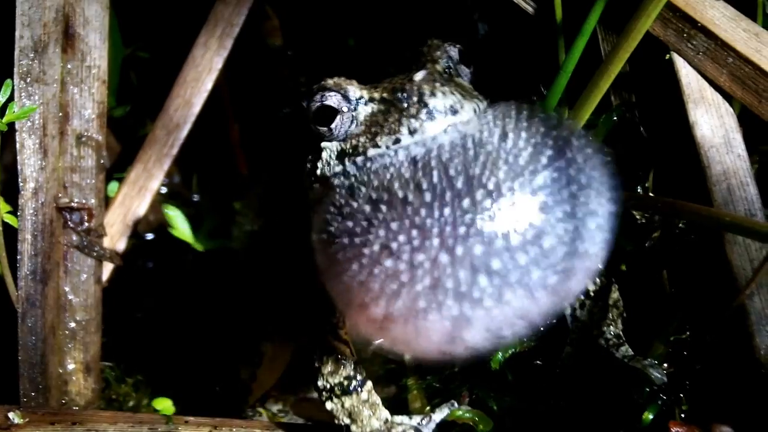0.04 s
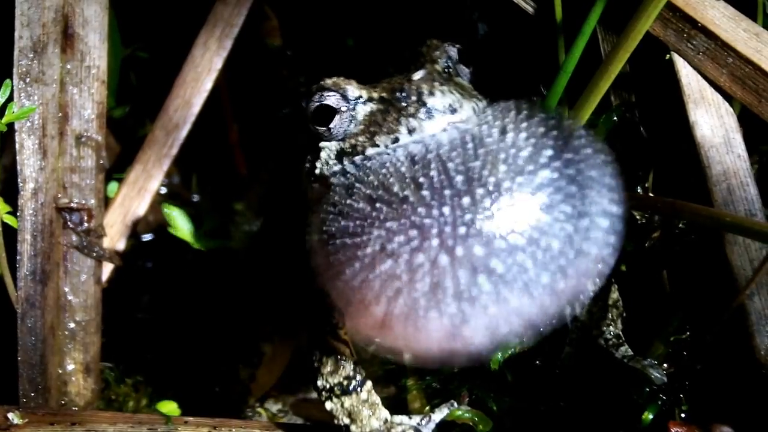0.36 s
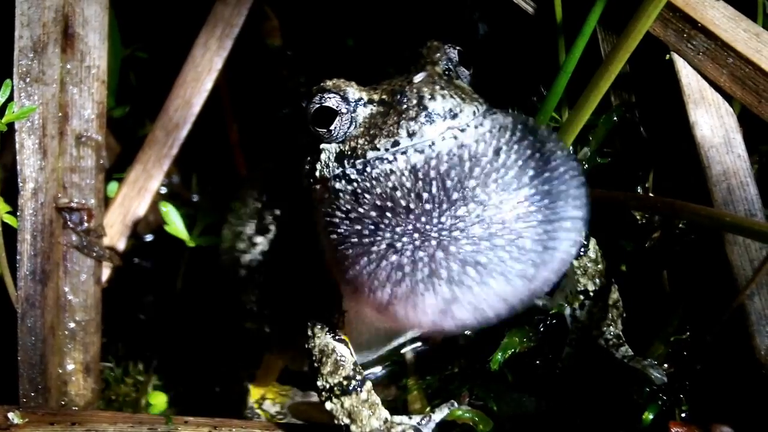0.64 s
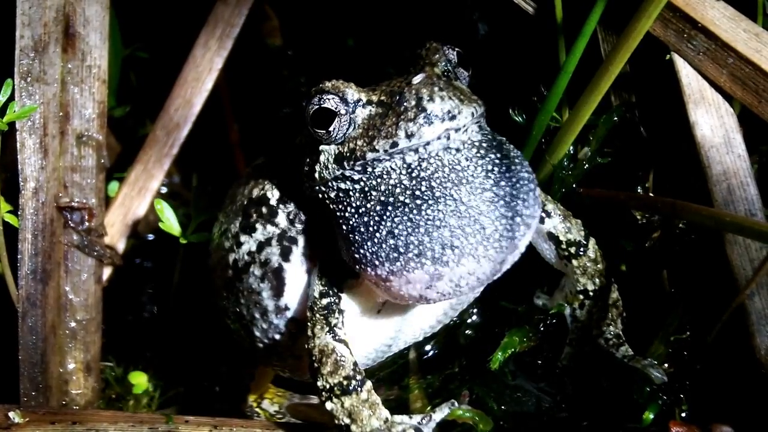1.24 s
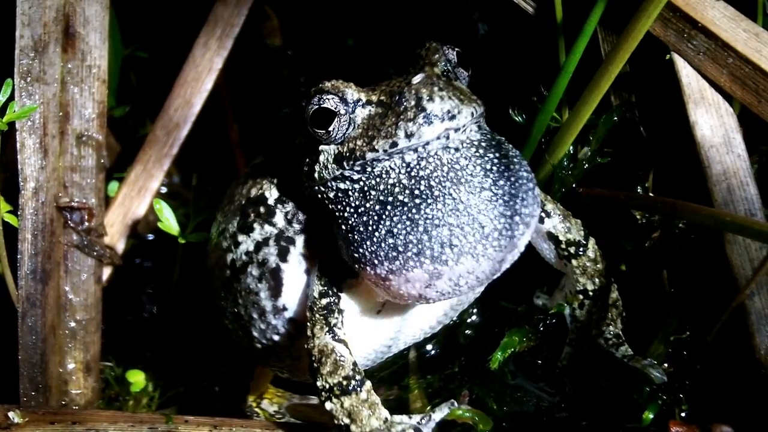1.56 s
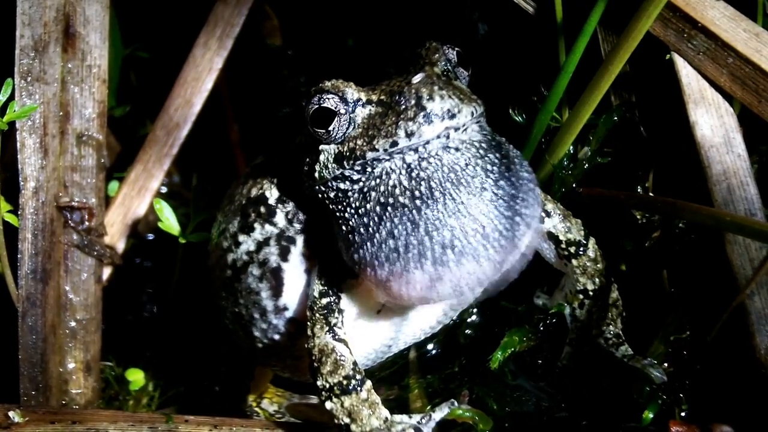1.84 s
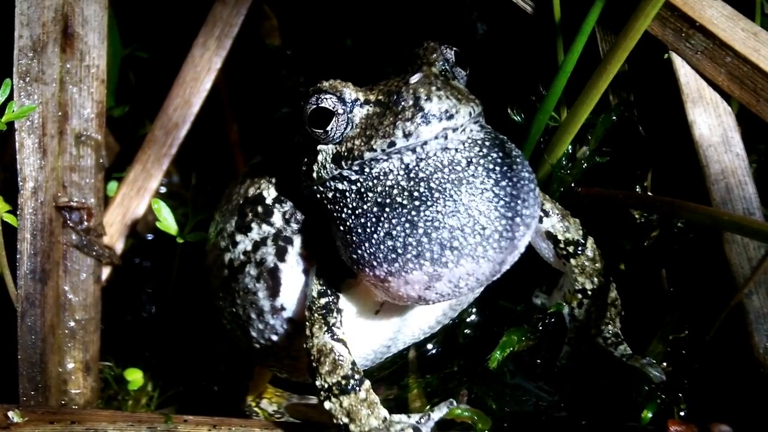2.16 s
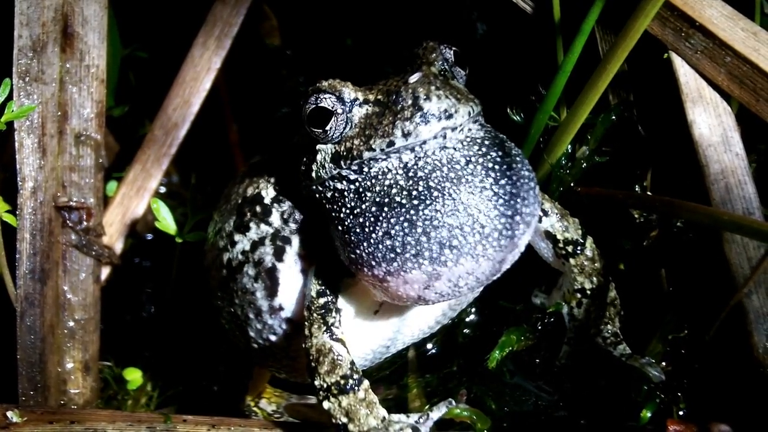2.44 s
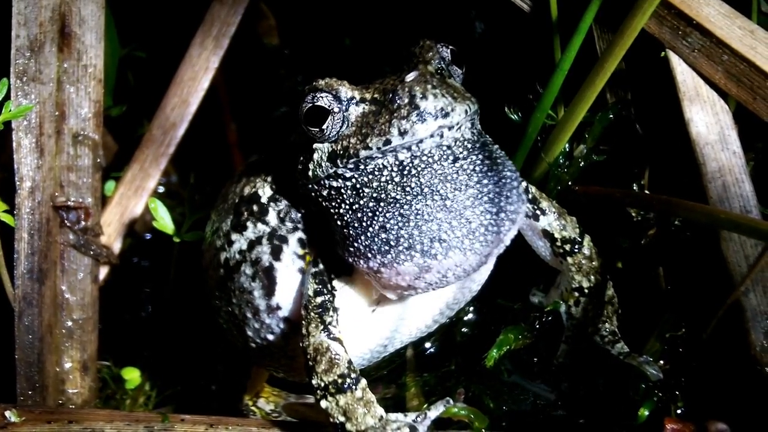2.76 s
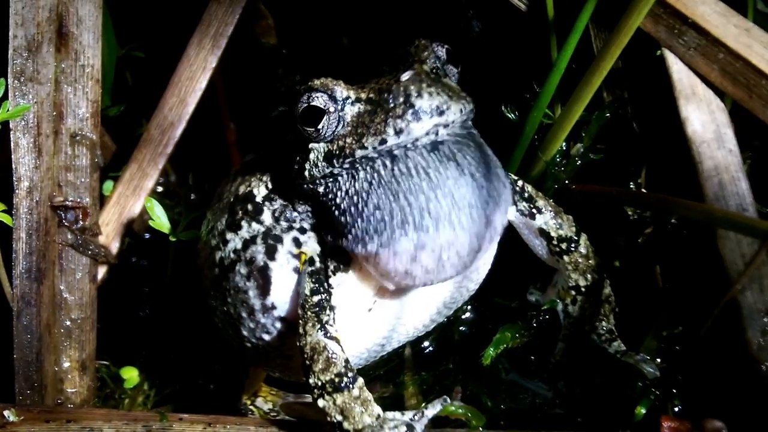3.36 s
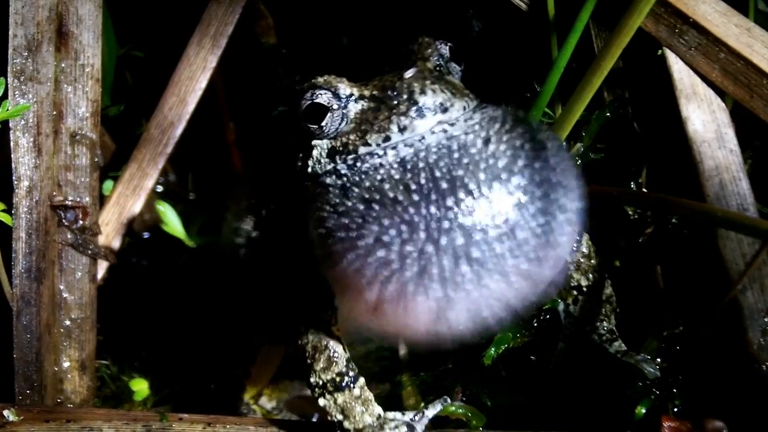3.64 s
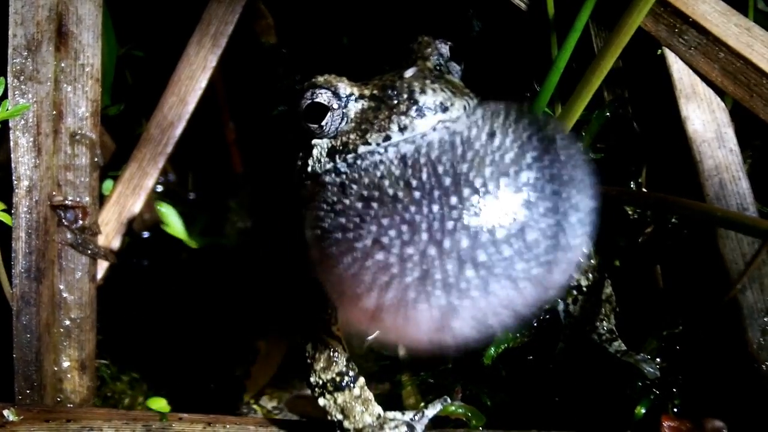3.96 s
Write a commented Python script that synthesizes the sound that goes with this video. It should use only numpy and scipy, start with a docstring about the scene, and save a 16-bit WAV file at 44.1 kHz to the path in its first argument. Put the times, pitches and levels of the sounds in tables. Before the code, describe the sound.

A loud, rapidly pulsing tree frog trill sounds up close beside a pond at night. When it stops, small frogs' rising, whistled peeps come forward with more distant trills. The near frog briefly resumes at the end.

```python
"""Tree frogs at a night pond

A tree frog trills right up close, rests, and starts again; each pulse is a rising tone that swells
and is cut off sharply. In the pause the gain control opens on three more tree frogs and a dense
chorus of small frogs whose peeps glide upward, over distant trills and the wash of the pond."""
import sys
import numpy as np
from scipy import signal
from scipy.io import wavfile
from scipy.ndimage import uniform_filter1d, minimum_filter1d

SR = 44100
rng = np.random.default_rng(int(sys.argv[2]) if len(sys.argv) > 2 else 0)


def master(y):
    """Save y as 16-bit WAV."""
    cut = np.clip(np.atleast_2d(y).T, -1, 1)
    pcm = np.round(cut * 32767)  # scale
    wavfile.write(sys.argv[1], SR, pcm.astype(np.int16))


N = 176400

# The close frog's pulses: cutoff_s, level_db, pitch_hz, length_s, relative_glide_per_s
CLOSE_PULSES = [(0.0232, 25.5, 986, 0.015, 11.8), (0.076, 23.5, 1006, 0.016, 10.6),
                (0.1257, 25, 1018, 0.014, 6.8), (0.1773, 24.5, 1017, 0.017, 8.2),
                (0.2293, 25, 1021, 0.016, 7.5), (0.2793, 24.5, 1031, 0.015, 8.7),
                (0.3296, 24.5, 1028, 0.015, 8.1), (0.3821, 25.5, 1026, 0.016, 8.1),
                (0.4323, 24.5, 1022, 0.016, 9.2), (0.4842, 25.5, 1032, 0.017, 6.8),
                (0.537, 27, 1029, 0.017, 7.5), (0.5903, 28, 1027, 0.017, 7.9),
                (0.642, 27, 1021, 0.015, 8.7), (0.6963, 28, 1028, 0.0166, 6.5),
                (0.7495, 28.5, 1027, 0.0166, 7.8), (0.8023, 29, 1029, 0.017, 6.7),
                (0.8566, 30.5, 1029, 0.017, 6.2), (0.9206, 29.5, 1016, 0.016, 6.7),
                (3.8263, -2, 899, 0.014, 32), (3.8796, 14.5, 930, 0.013, 16.5),
                (3.9297, 16.5, 931, 0.0153, 13.4), (3.9798, 18, 965, 0.015, 12)]
# How full its vocal sac is: time_s, fullness_share
SAC_FULLNESS = [(0, 0.89), (.9, 0.89), (3.83, 0.096), (3.93, 0.45), (3.98, 0.59)]
# Harmonics of a pulse, fundamental first: level_db, swell_factor, decay_db_per_s
PULSE_HARMONICS = [(-12, 0.48, 2702.5), (1, 0.91, 5202.5), (-18, 0.78, 11015.5), (-33, 1.0, 11991.5),
                   (-42.5, 1, 12000), (-45.5, 0.6, 12000), (-61.5, 1, 12007)]
# Tone colour of a tree frog's body: frequency_hz, gain_db
BODY_EQ = [(100, -50), (560, -33), (700, -28.5), (820, -4.5), (1000, -2.5), (1200, 5), (1450, -4),
           (1700, -3), (2050, 2), (2700, 0), (4200, 9.5), (6400, 1), (7300, 1), (7800, -26.5), (9500, -14),
           (11300, -1), (12500, -24), (16000, -42)]
# The neighbouring frog's pulses: cutoff_s, level_db, pitch_hz
NEIGHBOUR_PULSES = [(1.481, -22, 989), (1.536, -7.5, 914), (1.579, -2, 954), (1.624, 0, 960),
                    (1.671, -0.5, 965), (1.716, -1.5, 980), (1.763, -1.5, 975), (1.809, -1, 976),
                    (1.856, -1, 970), (1.904, -2, 972), (1.952, -2.5, 971), (2.001, -4, 971),
                    (2.05, -1, 977), (2.098, -1.5, 974), (2.145, -1.5, 993), (2.196, -1.5, 969),
                    (2.244, -12, 978), (2.289, -10, 979), (2.338, -10, 981), (2.39, -8.5, 981),
                    (2.44, -10.5, 972), (2.492, -8, 985), (2.544, -9.5, 970), (2.599, -9.5, 973),
                    (2.652, -8.5, 991), (2.711, -10.5, 976), (3.754, -6, 923), (3.798, -3.5, 922),
                    (3.845, -8, 980)]
# Pulses of a frog further off: cutoff_s, level_db, pitch_hz
FURTHER_PULSES = [(0.991, -43.5, 968), (1.036, -30, 999), (1.089, -19.5, 978), (1.137, -19.5, 996),
                  (1.19, -20.5, 959), (1.242, -16.5, 985), (2.842, -18.5, 948), (2.894, -14.5, 1005),
                  (2.938, -20, 941), (2.984, -16, 975), (3.037, -14, 995), (3.075, -19, 941),
                  (3.125, -18, 962), (3.173, -25, 956), (3.217, -27, 989), (3.291, -25.5, 965),
                  (3.342, -19, 998), (3.405, -24.5, 1011), (3.466, -21.5, 1005), (3.526, -34, 1011),
                  (3.591, -22.5, 1006), (3.648, -22, 1025)]
# Peeps that stand out of the chorus: start_s, length_s, first_hz, last_hz, level_db
NEAR_PEEPS = [(1.031, 0.1, 3580, 3760, -25), (1.034, 0.07, 3130, 3500, -14),
              (1.148, 0.27, 2690, 3100, -29.5), (1.167, .1, 3560, 3730, -36), (1.2, 0.19, 3250, 3500, -21),
              (1.249, 0.078, 3660, 3944, -20), (1.368, 0.091, 3102, 3370, -13.5),
              (1.445, 0.079, 3330, 3680, -24), (1.49, 0.071, 3102, 3350, -11.5),
              (1.55, 0.064, 3424, 3496, -21), (1.558, 0.084, 3203, 3425, -12.5),
              (1.727, 0.067, 3540, 3800, -28.5), (1.739, 0.058, 3256, 3440, -10),
              (1.955, 0.058, 2950, 3190, -4), (1.959, 0.11, 3650, 3940, -31.5),
              (2.076, .11, 2690, 2900, -38), (2.274, 0.079, 3120, 3270, -12.5),
              (2.383, 0.082, 3200, 3310, -14.5), (2.515, 0.067, 3150, 3377, -16),
              (2.522, 0.078, 3526, 3750, -25.5), (2.625, .08, 3250, 3550, -20),
              (2.656, 0.08, 3630, 3954, -25.5), (2.852, 0.065, 3000, 3090, -24.5),
              (2.856, 0.077, 2570, 2780, -36.5), (2.9, 0.098, 3067, 3296, -16.5),
              (3.035, 0.076, 3166, 3373, -18), (3.041, 0.19, 2640, 3134, -33),
              (3.14, 0.14, 3250, 3750, -20.5), (3.148, 0.052, 3100, 3200, -19),
              (3.33, 0.052, 3070, 3220, -25.5), (3.343, 0.082, 3736, 3910, -24.5),
              (3.53, 0.12, 3083, 3276, -17), (3.658, 0.15, 3130, 3464, -15),
              (3.748, 0.091, 3090, 3220, -18), (3.793, 0.059, 3520, 3690, -28),
              (2.701, 0.062, 3208, 3460, -2), (3.474, 0.061, 3256, 3470, -2)]
# Spectrum of the pond's far wash: frequency_hz, level_db
WASH_SPECTRUM = [(20, -29), (80, -14), (170, -19.5), (330, -23.5), (680, -24.5), (980, -5.5), (1400, -24.5),
                 (1980, -5), (2600, -29.5), (2950, -14), (3330, 1), (3750, -10.5), (4200, -33.5),
                 (4950, -27), (5700, -37), (6900, -42), (7900, -63.5), (9300, -44.5), (12000, -45),
                 (15500, -55)]
# Echo of reeds and banks: frequency_hz, t60_s
POND_DECAY = [(300, 0.6), (1000, 0.088), (2000, .3), (3300, .4), (8000, 0.085)]


def trill_pulse(length, hz, glide, slack=0):
    """Tone and airflow of a pulse: raspy start, clean rising crest, cut-off at 2 * length, short ring."""
    crest_s, swell_db, closing_db = .00608, -16.5, -8.5
    flat_start, end_flick, flick_s = .05, .087, .00047
    sac_rise_db_per_s, slack_db, hiss_db = 194.5, 12.5, -44
    t = np.arange(-2 * length, .02, 1 / SR)  # zero is the cut-off
    before, after = np.minimum(t, 0), np.maximum(t, 0)
    envelope_db = swell_db * (np.maximum(-t - crest_s, 0) / max(length - crest_s, .002)) ** 1.49
    envelope_db += closing_db * np.clip(1 + before / crest_s, 0, 1) ** 3
    pitch = hz * np.exp(glide * (before + crest_s)) * (1 + end_flick * np.exp(before / flick_s))
    pitch *= 1 - flat_start * np.tanh((before / length) ** 2)
    rasp = .48 * (np.clip(-t / length, 0, 1.4) ** 4 + .46 * slack)
    phase = 2 * np.pi * np.cumsum(pitch) / SR + rasp / 2 * wander(t, 600) + rng.uniform(0, 2 * np.pi)
    # A slack sac favours the fundamental.
    sac_db = sac_rise_db_per_s * (before + crest_s) + slack_db * slack
    tone = sum(amp(db + swell * envelope_db - decay * after + (k == 1) * sac_db) * np.cos(k * phase)
               for k, (db, swell, decay) in enumerate(PULSE_HARMONICS, 1))
    hiss = amp(hiss_db + .5 * envelope_db - 1000 * after) * rng.standard_normal(len(t))
    tone *= 1 + rasp * wander(t, 900)
    airflow = amp(.6 * envelope_db - 13000 * after)
    fade_in = np.minimum((t - t[0]) / .004, 1)
    return fade_in * (tone + hiss), fade_in * airflow


def frog_body(x, size=4096):
    """The body's resonances colour the voice, as a minimum-phase filter."""
    log_gain = np.log(amp(curve_at(BODY_EQ, abs(np.fft.fftfreq(size, 1 / SR)))))
    ring = np.fft.ifft(np.exp(signal.hilbert(log_gain).conj())).real
    return signal.fftconvolve(x, ring[:size // 2])[:N]


def close_frog(puff_db=-21, puff_low_hz=24, puff_high_hz=300, wet_db=-44):
    """The lead trill, almost dry; the heaving vocal sac pushes puffs of air, weaker when it is slack."""
    voice, air = np.zeros(N), np.zeros(N)
    for cutoff, db, hz, length, glide in CLOSE_PULSES:
        fullness = np.interp(cutoff, *np.transpose(SAC_FULLNESS))
        tone, airflow = trill_pulse(length, hz, glide, slack=1 - fullness)
        add(voice, cutoff - 2 * length, amp(db) * tone)
        add(air, cutoff - 2 * length, amp(db) * fullness ** 2 * airflow)
    voice = frog_body(voice)
    puff = signal.sosfilt(signal.butter(2, puff_low_hz, "high", fs=SR, output="sos"), air)
    puff = signal.sosfiltfilt(signal.butter(2, puff_high_hz, fs=SR, output="sos"), puff)
    return voice + amp(puff_db) * puff + amp(wet_db) * pond_echo(voice)


def other_frog(pulses, length_s=.02, glide_per_s=8.6, wet_db=-8.5, lowpass_hz=1870):
    """The same kind of trill from further away: duller and wetter."""
    voice = np.zeros(N)
    for cutoff, db, hz in pulses:
        add(voice, cutoff - 2 * length_s, amp(db) * trill_pulse(length_s, hz, glide_per_s)[0])
    voice = signal.sosfilt(signal.butter(3, lowpass_hz, fs=SR, output="sos"), frog_body(voice))
    return voice + amp(wet_db) * pond_echo(voice)


def joining_frog(start_s=2.8, end_s=3.46, gap_s=.0488, gain_db=-11.5, fade_db_per_s=13.5, hz=960):
    """A fourth tree frog joins late in the pause with an even, fading trill."""
    cutoffs = np.arange(start_s, end_s, gap_s)
    return other_frog([(s, gain_db - fade_db_per_s * (s - start_s), hz) for s in cutoffs])


def peep(length, first_hz, last_hz):
    """A nearly pure whistle that glides upward, with faint partials a fifth and an octave above."""
    rise_s, fall_s, waver_hz, waver_db, fifth_db, octave_db = .0062, .0077, 13, 1.6, -44, -59.5
    t = np.arange(0, length, 1 / SR)
    pitch = first_hz + (last_hz - first_hz) * t / length + waver_hz * wander(t, 120)
    phase = 2 * np.pi * np.cumsum(pitch) / SR
    ramps = np.clip(np.minimum(t / rise_s, (length - t) / fall_s), 0, 1)
    envelope = np.sin(np.pi / 2 * ramps) ** 2 * amp(waver_db * wander(t, 70))
    partials = amp(fifth_db) * np.sin(1.5 * phase) + amp(octave_db) * np.sin(2 * phase)
    return envelope * (np.sin(phase) + partials)


def near_peepers(wet_db=-24):
    """The nearest small frogs, whistling clear of the chorus."""
    voice = np.zeros(N)
    for start, length, first_hz, last_hz, db in NEAR_PEEPS:
        add(voice, start, amp(db) * peep(length, first_hz, last_hz))
    return voice + amp(wet_db) * pond_echo(voice)


def peeper_chorus(peeps_per_s=130, centre_hz=3200, spread_hz=135, rise_hz=230.8):
    """Overlapping peeps from all round the pond, softer towards the edges of their pitch range."""
    voice = np.zeros(N)
    for start in np.arange(-.1, N / SR, 1 / peeps_per_s):
        late, stretch, tune, loud = np.clip(rng.standard_normal(4), -2, 2)
        hz = centre_hz + spread_hz * tune
        call = peep(.1 * np.exp(.13 * stretch), hz, hz + rise_hz)
        add(voice, start + .018 * late, amp(5.1 * loud - .5 * tune ** 2) * call)
    return unit(voice + .25 * pond_echo(voice))


def distant_trills(frogs=4, pulses_per_s=55, centre_hz=980):
    """Tree frogs across the pond, each at its own pace and pitch."""
    voice = np.zeros(N)
    for pace, tune, offset in rng.uniform(-1, 1, (frogs, 3)):
        tone = trill_pulse(length=.02, hz=centre_hz * (1 + .071 * tune), glide=10.5)[0]
        beats = np.arange(offset - 1, N / SR * pulses_per_s * 1.2)
        for start in beats / (pulses_per_s * (1 + .038 * pace)):
            add(voice, start, tone)
    return unit(frog_body(voice + pond_echo(voice)))


def pond_wash(flicker_db=3.5):
    """Far voices blurred into flickering noise, with low night rumble and faint hiss."""
    frames, hz = N // 256 + 5, np.fft.rfftfreq(1024, 1 / SR)
    real, imag, patches = rng.standard_normal((3, frames, 513))
    patches = unit(uniform_filter1d(uniform_filter1d(patches, size=10, axis=0), size=10, axis=1))
    level_db = curve_at(WASH_SPECTRUM, hz) + flicker_db * patches * np.clip(hz / 1000, .4, 1)
    spectrum = (real + 1j * imag) * amp(level_db)
    return unit(signal.istft(spectrum.T, nperseg=1024, noverlap=768)[1][:N])


def pond_echo(x, predelay_s=.0017):
    """Sparse echoes off reeds and banks, each band dying at its own speed."""
    size = SR // 2
    taps = rng.standard_normal(size) * (rng.random(size) < .1) * (np.arange(size) > predelay_s * SR)
    hz, t, bands = signal.stft(taps, SR, nperseg=256)
    decay = amp(-60 * t / curve_at(POND_DECAY, hz)[:, None])
    tail = signal.istft(bands * decay, SR, nperseg=256)[1]
    return signal.fftconvolve(x, tail / np.linalg.norm(tail))[:N]


def gain_control(x, threshold_db=-22, ratio=7.13, sense_s=.025, attack_s=.018, release_db_per_s=124):
    """Heavy compression ducks the pond under every loud call and opens up in the gaps."""
    level_db = 10 * np.log10(lag(x ** 2, sense_s) + 1e-12)
    reduction_db = np.maximum(level_db - threshold_db, 0) * (1 - 1 / ratio)
    release_db = np.arange(N) / SR * release_db_per_s
    held_db = np.maximum.accumulate(reduction_db + release_db) - release_db
    return x * amp(-lag(held_db, attack_s))


def limiter(x, ceiling=.71, grit_knee=.26, grit_db=-25, grit_hz=3000):
    """Catches peaks that outrun the gain control; strong treble overloads with a gritty crackle."""
    treble = signal.sosfilt(signal.butter(6, 2800, "high", fs=SR, output="sos"), x)
    overload = np.clip(peak_envelope(treble) - grit_knee, 0, .5)
    crackle = rng.standard_normal(N) * amp(2 * rng.standard_normal(N))
    grit = signal.lfilter(*signal.butter(1, grit_hz, fs=SR), crackle)
    return x / np.maximum(peak_envelope(x) / ceiling, 1) + amp(grit_db) * overload * grit


def peak_envelope(x):
    """Rides the peaks over about 2 ms."""
    return uniform_filter1d(-minimum_filter1d(-abs(x), size=90), size=60)


def amp(db):
    """Decibels to gain."""
    return 10 ** (np.asarray(db) / 20)


def unit(x):
    """Scales to rms 1."""
    return x / np.sqrt(np.mean(x ** 2) + 1e-20)


def curve_at(points, hz):
    """Reads a table on a log-frequency axis."""
    f, value = np.transpose(points)
    return np.interp(np.log(hz + 1), np.log(f + 1), value)


def add(mix, start_s, sound):
    """Mixes a sound in at its cue."""
    at = round(start_s * SR)
    sound = sound[max(-at, 0):]
    part = mix[max(at, 0):][:len(sound)]
    part += sound[:len(part)]


def lag(x, seconds):
    """One-pole smoothing that starts settled."""
    pole = np.exp(-1 / (seconds * SR))
    return signal.lfilter([1 - pole], [1, -pole], x, zi=[pole * x[:SR // 20].mean()])[0]


def wander(t, per_s, count=64):
    """A random curve of about unit size."""
    return np.interp((t - t[0]) * per_s, np.arange(count), rng.standard_normal(count))


def scene():
    """The mono mix: every frog over the wash, with faders in dB."""
    mix = amp(-25.5) * pond_wash()
    mix += amp(2.5) * close_frog()
    mix += amp(5) * near_peepers()
    mix += amp(1.6) * other_frog(NEIGHBOUR_PULSES, length_s=.017, wet_db=-17, lowpass_hz=2450)
    mix += amp(5.5) * other_frog(FURTHER_PULSES, glide_per_s=10.5)
    mix += joining_frog()
    mix += amp(-42.5) * distant_trills()
    mix += amp(-16) * peeper_chorus()
    return mix[None]


def record(dry):
    """The master chain: gain control, peak limiter and a steep high cut."""
    high_cut = signal.firwin(511, cutoff=15600, window=("kaiser", 9), fs=SR)
    return signal.oaconvolve(limiter(gain_control(dry[0])), high_cut, "same")[None]


dry = scene()
out = record(dry)
master(out)
```